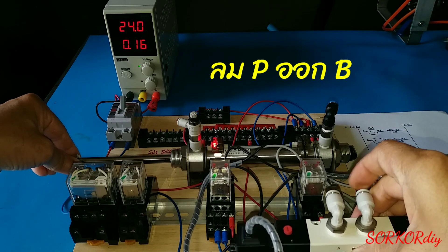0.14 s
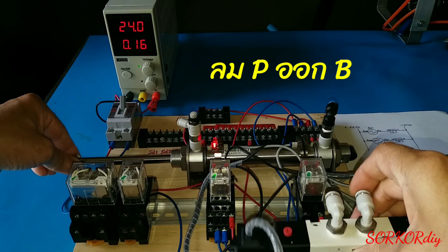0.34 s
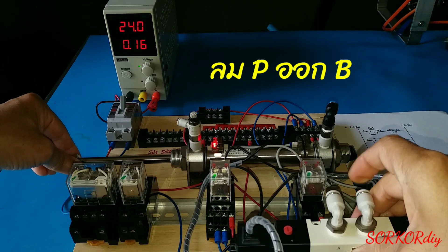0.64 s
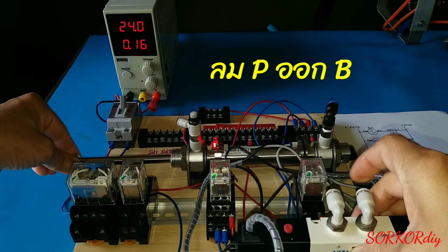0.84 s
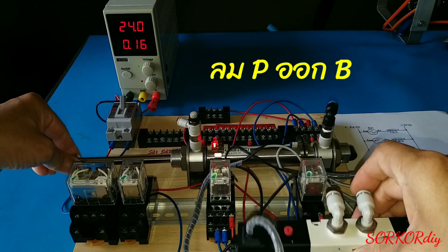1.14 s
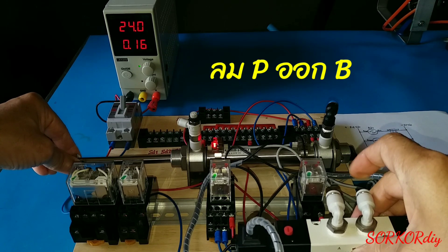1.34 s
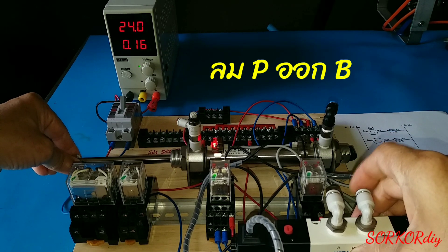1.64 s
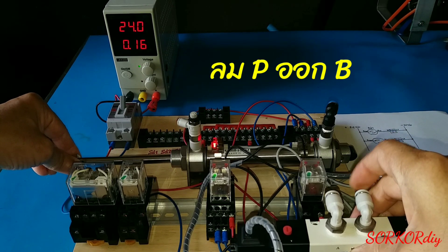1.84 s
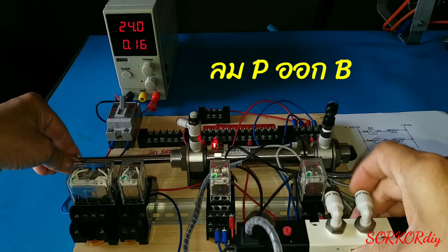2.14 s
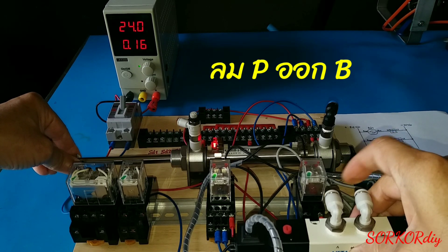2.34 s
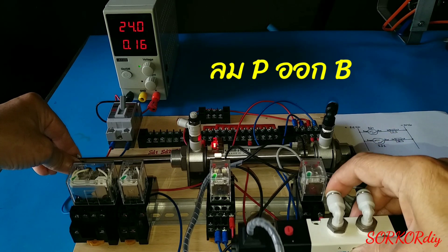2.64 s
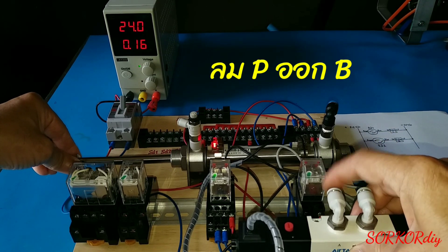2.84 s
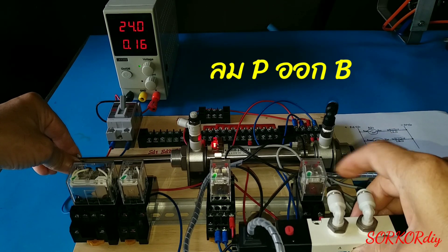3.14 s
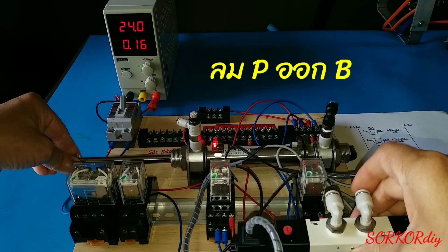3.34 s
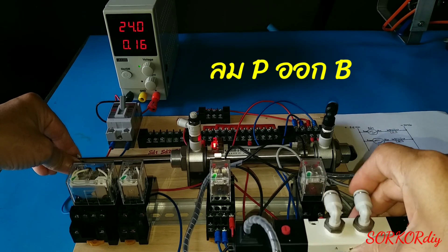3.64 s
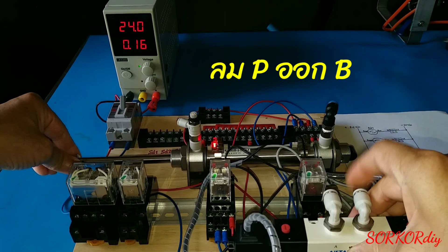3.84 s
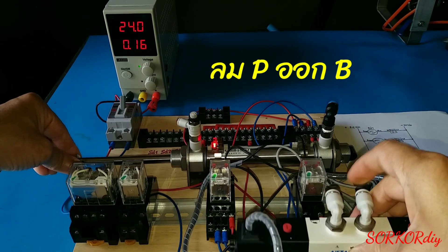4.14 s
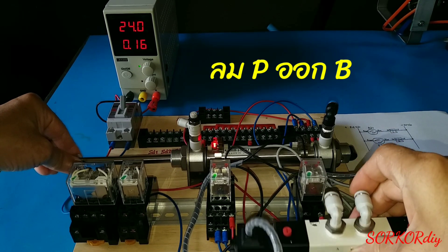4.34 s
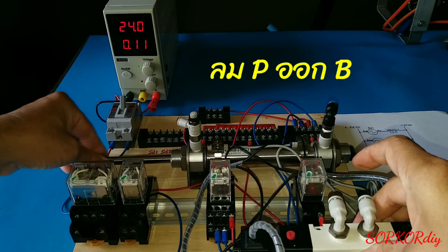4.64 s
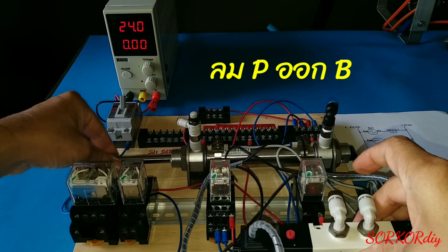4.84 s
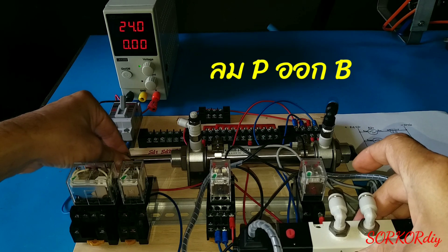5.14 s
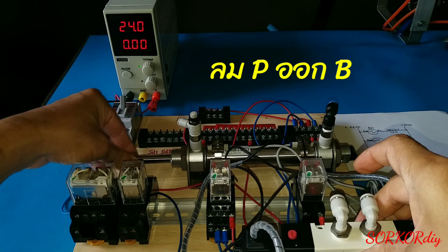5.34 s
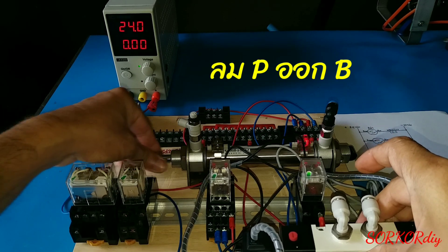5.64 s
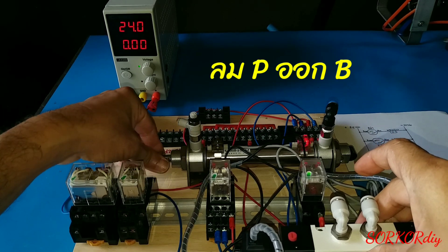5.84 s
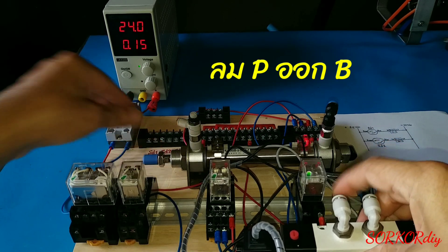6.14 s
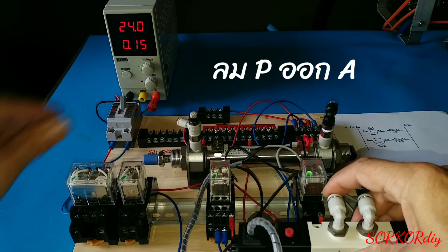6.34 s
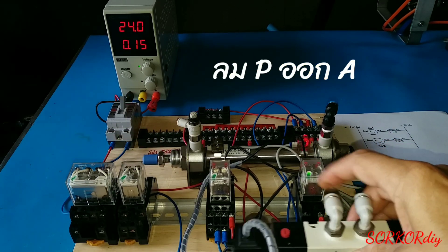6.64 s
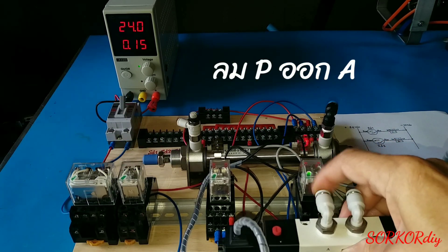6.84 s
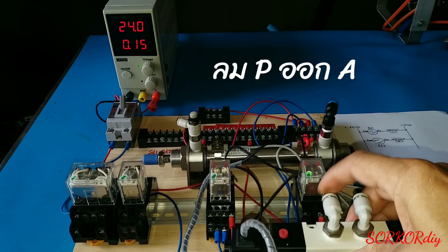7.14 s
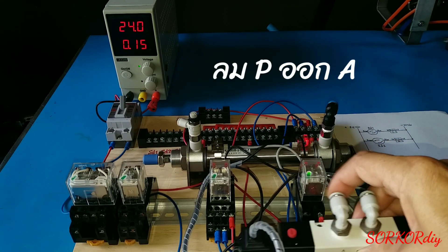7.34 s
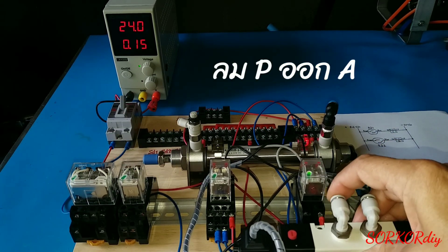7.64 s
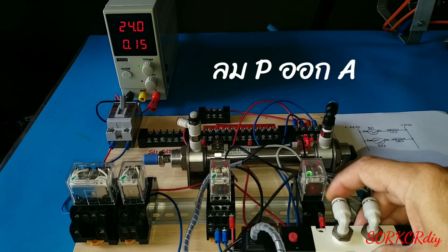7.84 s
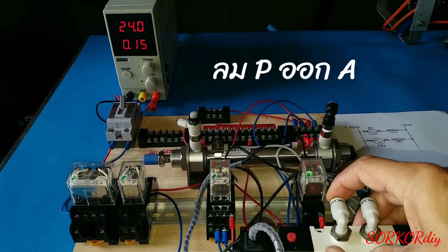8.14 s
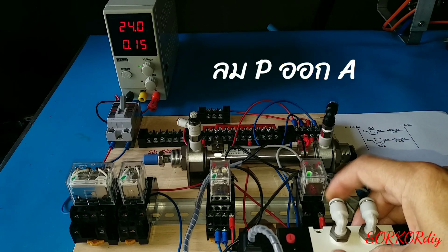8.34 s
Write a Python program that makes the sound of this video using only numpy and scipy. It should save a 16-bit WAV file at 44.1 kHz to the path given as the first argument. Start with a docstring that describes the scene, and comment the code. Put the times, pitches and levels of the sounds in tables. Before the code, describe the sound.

Close, dry and loud: pressurised air blasts over two microphones as ragged, bursting noise with a high sizzling hiss on top. Quick finger passes cut the roar for about a tenth or two of a second, deepest near four seconds, then it springs back. Around six seconds the flow moves to another port; afterwards the dips come more regularly and the blowing grows more fluttery, continuing to the end without shutting off.

```python
"""Air roars over a close pair of microphones, unrelated left and right, and a jet hisses high and bright.
Compressed air leaves an open valve port on a bench; the valve then passes it to a second port.
The roar is noise in short bursts, coloured by stream strength; lone eddies thump on the right.
A finger dips in and out of the jet, lowering roar and hiss, with surges at the edges of each dip.
The hiss is noise filtered per port, partly alike at the two microphones, combed by echoes off bench and hand."""
import sys
import numpy as np
from scipy import signal
from scipy.fft import rfft, irfft
from scipy.io import wavfile
from scipy.ndimage import uniform_filter1d

SR = 44100
rng = np.random.default_rng(int(sys.argv[2]) if len(sys.argv) > 2 else 0)


def digitize_waveform(pressure):
    """Quantize a signal to 16-bit integers and store it at the path in sys.argv[1].

    Rows of a 2-D input are taken as channels; values are limited to [-1, 1].
    """
    field = np.atleast_2d(pressure).T
    bounded = np.clip(field, -1, 1)
    quanta = np.round(bounded * 32767).astype(np.int16)
    wavfile.write(sys.argv[1], SR, quanta)


N = 374850

EDGE_HZ = 15505  # upper band limit
SIZE, HOP = 512, 128  # short-time frame and step, samples
HZ = np.fft.rfftfreq(SIZE, 1 / SR)

# flow passes from first port to second: (start [s], end [s])
VALVE_S = (5.5, 6.1)
# lone eddies at the edge of the stream: (time [s], level [dB], starting pitch [Hz])
PUFFS = [(.336, -15, 700), (0.383, -11, 1200), (0.567, -19, 900), (1.25, -21, 1000), (1.762, -11.5, 1000),
         (2.301, -17, 1000), (3.865, -9, 1150), (4.295, -13, 900), (6.263, -12, 1000), (6.801, -8, 1300),
         (6.84, -19, 2000), (6.848, -14, 1600), (7.106, -15, 1100), (7.132, -8, 1000), (7.396, -12, 1000),
         (7.762, -8, 800), (8.075, -18, 1000), (8.36, -10, 1020)]


def amp(db):
    """Decibels to gain."""
    return 10 ** (np.asarray(db) / 20)


def columns(table, at, warp=np.asarray):
    """Interpolates every column of a table at the given times or frequencies."""
    key, *values = np.transpose(table)
    return np.array([np.interp(warp(at), warp(key), v) for v in values])


def by_hz(table, hz):
    """Reads a spectrum table on a log-frequency axis."""
    return columns(table, hz, np.log1p)


def bump(t, centre_s, width_s):
    """Gaussian pulse of height 1; width_s is the half-width at 1/e."""
    return np.exp(-((t - centre_s) / width_s) ** 2)


def spectra(x):
    """Frame times and short-time spectra."""
    return signal.stft(x, SR, nperseg=SIZE, noverlap=SIZE - HOP)[1:]


def sound(z):
    """Short-time spectra back to samples."""
    return signal.istft(z, SR, nperseg=SIZE, noverlap=SIZE - HOP)[1][:, :N]


def smooth_chance(shape, *sizes):
    """Random field of rms 1, smoothed twice along each of its last axes."""
    x = rng.standard_normal(shape)
    for k, size in enumerate(sizes):
        axis = k - len(sizes)
        x = uniform_filter1d(uniform_filter1d(x, size, axis), size, axis)
    return x / x.std()


def covered(t, start, going_in, end, coming_out):
    """How far the finger is in, 0-1, with rounded edges."""
    ramp = np.minimum((t - start) / going_in, (end - t) / coming_out)
    return np.sin(np.pi / 2 * np.clip(ramp, 0, 1)) ** 2


def flow(t, surge_fades_s=0.058, surge_builds_s=0.0052, surge_before=0.77, lingers_s=0.0054):
    """Left stream, right stream and hiss in dB: open flow, lowered by each dip, with surges at its edges."""
    # open flow between dips: (time [s], left stream [dB], right stream [dB], hiss [dB])
    open_flow = [(0.0, -18.5, -16.5, -14), (1.0, -20.5, -16, -15.5), (1.6, -21, -15.5, -14.5),
                 (2.5, -22, -16.5, -15.5), (3.3, -20.5, -15.5, -15), (4.6, -21.5, -15.5, -16),
                 (5.5, -22, -15.5, -14.5), (6.2, -21.5, -15, -15), (6.5, -25, -16.5, -16),
                 (7.3, -20, -16.5, -15.5), (7.9, -22.5, -16, -17), (8.5, -19, -16.5, -16)]
    # finger dips: (start [s], going in [s], stay [s], coming out [s], earlier onset in left and hiss [s],
    # left drop [dB], right drop [dB], hiss drop [dB], surge [dB])
    dips = [(0.028, 0.08, 0.0017, 0.051, 0, 4, 7, 2.5, 3), (0.313, 0.042, 0, 0.076, 0.038, 10.5, 6, 1, 2.5),
            (0.517, 0.1, 0.013, 0.017, 0.014, 8, 14, 0.5, 1),
            (0.752, 0.028, 0.037, 0.05, 0.0016, 8, 9, -0.5, 3.5),
            (1.173, 0.041, 0.045, 0.044, 0.009, 5, 6.5, 1, 4),
            (1.689, 0.053, 0.086, 0.062, 0.0, 6, 5.5, 2, 1),
            (1.981, 0.087, 0, 0.099, 0.0097, 10.5, 19.5, 0.4, 4.5),
            (2.197, 0.05, 0.023, 0.1, 0.014, 6.5, 14, 0.5, 3),
            (2.625, 0.008, 0.077, 0.12, 0.036, 2, 0.7, 1, -0.5),
            (3.399, 0.041, 0.12, 0.053, 0.012, 8, 20, 1, 0), (3.669, 0.072, 0.08, 0.084, 0, 13, 22, 2, 3),
            (4.05, 0.022, 0.041, 0.068, 0.006, 11, 20, -0.5, 2.5),
            (4.249, 0.14, 0.0, 0.053, 0.035, 11, 20, 0.5, 0),
            (5.721, 0.0065, 0.089, 0.074, 0.12, 1, 2.5, 1, -1.5),
            (6.237, 0.008, 0.0076, 0.1, 0.049, 2.5, 6, 2.5, 5),
            (6.467, 0.12, 0.0029, 0.064, 0.087, 1, 6.5, 2.0, 8.5),
            (6.765, 0.032, 0.068, 0.031, 0.006, 5, 7.5, 2, 4),
            (6.994, 0.044, 0.063, 0.072, 0.03, 7, 7.5, 4, 0.5),
            (7.372, 0.046, 0.061, 0.089, 0.0015, 10, 5.5, 1, 5.5),
            (7.764, 0.0061, 0, 0.072, 0.12, 4.5, 10.5, 1, 3.5),
            (7.982, 0.04, 0.044, 0.074, 0.079, 7.5, 8, 1.5, 1.5),
            (8.223, 0.064, 0.0091, 0.093, 0.0015, 11.5, 11, 1.8, -4),
            (8.434, 0.033, 0.045, 0.109, 0, 9.5, 7.5, 3, 6)]
    # share of the surge: rows left stream, right stream, hiss (share [dB/dB])
    surge_share = [
        [0.85],
        [0.24],
        [0.05],
    ]
    level_db = columns(open_flow, t)
    for start, going_in, stays, coming_out, early, left_db, right_db, hiss_db, surge_db in dips:
        end = start + going_in + stays + coming_out
        narrow = covered(t, start, going_in, end, coming_out)
        # left stream and hiss fall earlier and return later
        wide = covered(t, start - early, going_in + early, end + lingers_s, coming_out + lingers_s)
        after = np.exp(-np.maximum(t - end - lingers_s, 0) / surge_fades_s)
        before = surge_before * np.exp(-np.maximum(start - early - t, 0) / surge_builds_s)
        surge = surge_db * (1 - wide) * np.where(t > start + going_in, after, before)
        drop_db = [left_db * wide, right_db * narrow, hiss_db * wide]
        level_db = level_db + surge * surge_share - drop_db
    return level_db


def stream_strength(t):
    """Left and right stream in dB, relative to the strength at which the roar colour holds."""
    # reference strength: (left [dB], right [dB])
    steady_db = [-22, -16]
    return flow(t)[:2] - np.c_[steady_db]


def eddy_bursts(eddy_db=((3.2,), (5.,)), gust_db=((.8,), (.8,)), wilder_per_db=0.022, calm_db=-15,
                wildest=1.7, sputter_db=((2.5,), (5,)), sputter_at_db=-5, sputter_span_db=1.5):
    """Burst envelope of the eddies: wilder in a strong stream, in fits when half blocked, rms 1."""
    now_db = np.repeat(stream_strength(np.arange(0, N, HOP) / SR), HOP, axis=1)[:, :N]
    wild = np.clip(1 + wilder_per_db * now_db, 0, 2)
    wild = wild / (1 + np.exp((calm_db - now_db) / 2.5))  # a blocked stream leaves a smooth rush
    fits_db = np.array(sputter_db) * bump(now_db, sputter_at_db, sputter_span_db) * smooth_chance((2, N), 180)
    eddies_db = wild * eddy_db * np.minimum(smooth_chance((2, N), 14), wildest)
    gusts_db = gust_db * smooth_chance((2, N), 700)
    bursts = amp(eddies_db + gusts_db + fits_db)
    return bursts / np.sqrt(np.mean(bursts ** 2, axis=1, keepdims=True))


def roar(even_hz=3000, deep_hz=130, lag_turns=0.3518):
    """Bursting noise mixed with an even rush in the top and deep bass, coloured as at steady strength."""
    # roar at steady strength: (frequency [Hz], left [dB per Hz], right [dB per Hz])
    steady_roar = [(25, -84, -80), (40, -76, -83), (61.4, -66, -59.5), (138, -61.5, -52), (280, -62, -51),
                   (580, -56.5, -47.5), (1090, -55.5, -48.5), (1880, -55, -51.5), (2960, -56.5, -55.5),
                   (4230, -59.5, -58), (4720, -65.5, -64), (5300, -69, -65.5), (6000, -69, -68),
                   (6940, -83, -95)]
    bursts = eddy_bursts()
    eddies, rush = rng.standard_normal((2, 2, N))
    hz = np.fft.rfftfreq(N, 1 / SR)
    falling = np.exp(-2j * np.pi * lag_turns * np.log1p(hz))  # each eddy slows as it passes: bass comes last
    top = 1 / (1 + (even_hz / (hz + 1)) ** 2)
    deep = 1 / (1 + (hz / deep_hz) ** 2)
    even = np.clip(top + deep, 0, 1)  # share of power that does not burst
    mixed = np.sqrt(1 - even) * rfft(eddies * bursts) * falling + np.sqrt(even) * rfft(rush)
    return irfft(mixed * amp(by_hz(steady_roar, hz)) * np.sqrt(SR / 2), N)


def wind(lull_db=-4, lull_s=0.013, patchy_db=1.0):
    """Eddies roar at each microphone; stream strength, brief gusts and lulls, and valve shift level and colour."""
    # response to stream strength: (frequency [Hz], left [dB/dB], right [dB/dB])
    wind_swing = [(60, 1.25, .2), (150, 1.5, .45), (300, 1.4, .85), (1000, 1.1, 1.05), (3000, .9, .85),
                  (5000, .6, .55)]
    # brief gusts and lulls in the roar: (time [s], 1/e half-width [s], left [dB], right [dB])
    gusts_and_lulls = [(.16, .015, -2, 0), (.36, 0.023, -1, -13), (.51, 0.011, 4, 1), (.665, 0.016, 6, -4),
                       (.87, .012, 3, 3.5), (.9, .012, -9, 1.5), (1.0, 0.033, -2, -2.5),
                       (1.04, 0.027, 2, 2), (1.25, 0.028, 1, -3), (1.75, .015, 2, -5),
                       (1.81, .03, -3, -8.5), (2.16, 0.013, 0, -2), (2.27, .02, -3, -2),
                       (3.46, 0.028, -8, 4), (3.52, .025, -2, 1.5), (3.6, .02, 2, 0.5), (3.78, .03, -3, 3),
                       (3.83, .02, 1, 1), (3.92, .012, 5, 3), (4.04, 0.012, 5, 0), (4.075, .015, -2, 0),
                       (4.12, .012, 7, 3), (4.265, .015, 8, -0.5), (4.45, .015, 6, 0),
                       (4.63, 0.017, -5, -1), (4.74, 0.014, 2, 4.5), (5.08, .012, -2, 0),
                       (6.19, 0.028, 2, 1), (6.1, 0.011, 0, 0), (6.33, .007, -7, -6), (6.44, .015, 2, -1.5),
                       (6.53, .015, 0, -1), (6.485, 0.017, 7, 2.5), (6.57, .012, -2, 4),
                       (6.66, 0.016, 2, 0), (6.78, .008, 2, -1), (6.86, .015, -1, 3), (6.9, .015, 5, 3.5),
                       (6.93, .012, 3, -7), (6.97, 0.011, 7, -5), (7.04, .015, 5, 1), (7.11, 0.011, -8, 3),
                       (7.18, 0.013, 6, 2), (7.27, 0.014, 6, 2), (7.425, 0.0088, 7, -6),
                       (7.465, 0.018, 5, -9), (7.49, .015, 2, 2), (7.69, 0.013, -3, -9),
                       (7.73, 0.024, 7, -3.5), (7.67, .008, -3, 4), (7.81, .012, -1, -6),
                       (7.86, .015, 7, -2), (7.92, 0.031, -3, -4), (7.985, 0.015, 12, -2),
                       (8.03, 0.027, 0, -6), (8.075, .012, -2, 6), (8.135, 0.022, 2, 4),
                       (8.245, 0.009, 0, 4), (8.29, .018, 2, -13), (8.345, .01, 0, -2),
                       (8.395, 0.012, 10, 1), (8.44, .012, 1, -2)]
    # response to a gust or lull: (frequency [Hz], change [dB/dB])
    gust_reach = [(80, -0.5), (300, 0.64), (1000, 0.84), (2500, 0.54), (5000, 0.85)]
    # extra bass loss in deep dips: (frequency [Hz], left [dB/dB^2], right [dB/dB^2])
    choke = [(60, 0, .045), (150, 0, .042), (300, 0, .025), (1000, 0, .004), (3000, 0, 0)]
    # roar from second port against first: (frequency [Hz], left [dB], right [dB])
    second_roar = [(100, -1, -0.5), (300, 0, -0.5), (1000, 0, -0.1), (2500, -0.9, 0.5), (5500, 0, 1.5)]
    t, z = spectra(roar())
    strength_db = stream_strength(t)
    brief_db = sum(np.c_[[left, right]] * bump(t, s, width) for s, width, left, right in gusts_and_lulls)
    # the right stream slackens around each lone eddy
    brief_db[1] = brief_db[1] + sum(lull_db * bump(t, s, lull_s) for s, _, _ in PUFFS)
    swing_db = strength_db[:, None] * by_hz(wind_swing, HZ)[:, :, None]
    choked_db = np.minimum(strength_db, 0)[:, None] ** 2 * by_hz(choke, HZ)[:, :, None]
    gusty_db = brief_db[:, None] * by_hz(gust_reach, HZ)[:, :, None]
    second_db = np.interp(t, VALVE_S, [0, 1]) * by_hz(second_roar, HZ)[:, :, None]
    patches_db = patchy_db * smooth_chance(z.shape, 6, 12)
    return sound(z * amp(swing_db - choked_db + gusty_db + second_db + patches_db))


def puffs(slows_s=0.00076, lasts_s=0.0017, thin_hz=110):
    """Lone eddies at the right microphone: a thump of fast-falling pitch, with little deep bass."""
    out, t = np.zeros((2, N)), np.arange(600) / SR
    envelope = 2 * np.sqrt(t / lasts_s) * np.exp(-(t / lasts_s) ** 2)
    for s, db, hz in PUFFS:
        turns = hz * slows_s * np.log1p(t / slows_s)
        out[1, round(s * SR):][:len(t)] += amp(db) * np.sin(-2 * np.pi * turns) * envelope
    return signal.sosfilt(signal.butter(2, thin_hz, "high", fs=SR, output="sos"), out)


def port(z, colour, pair, echoes, rumble_hz=200):
    """One port at two microphones: partly alike with a phase lead, combed by echoes, each gain of rms 1."""
    like, lead = by_hz(pair, HZ)[:, :, None]
    like = np.clip(like, 0, 1)
    right = like * np.exp(1j * lead) * z[0] + np.sqrt(1 - like ** 2) * z[1]
    comb = [abs(1 + sum(amp(db) * np.exp(-2j * np.pi * HZ * ms * 1e-3) for ms, db in side))
            for side in echoes]
    gain = amp(by_hz(colour, HZ)) * comb * (HZ < EDGE_HZ) * (HZ > rumble_hz)
    gain /= np.sqrt(np.mean(gain ** 2, axis=1, keepdims=True))
    return np.array([z[0], right]) * gain[:, :, None]


def jet(steady_db=-15.5, hiss_right_db=-1.62, wavers_db=0.5, patchy_db=1.6, ridges_db=2.0):
    """Turbulent hiss with drifting patches, and narrow ridges that drift slowly at random."""
    # relative hiss colour per port: (frequency [Hz], left [dB], right [dB])
    first_port = [(150, -45, -31), (500, -30, -43), (1540, -14, -16), (3400, -23, -15), (4300, -22.5, -20),
                  (4830, -19, -19), (5560, -19.5, -17), (6100, -21, -32), (6600, -18, -26),
                  (7000, -32, -24), (7500, -21, -22), (7690, -8.5, -14.5), (9550, -5.5, -13),
                  (11100, -2.5, -11), (11900, -3.5, -7.5), (12400, -5, -9.5), (12600, -0.5, -4.5),
                  (13200, 2.5, -5.5), (13600, 0.5, -5), (14300, 0, -4.5), (14800, 2, -9),
                  (15400, -5.5, -11.5), (15900, -4, -6)]
    second_port = [(150, -30, -8), (500, -26, -8), (1500, -13, -28), (3500, -39, -14), (4800, -14, -35),
                   (5700, -17, -17), (7130, -15.5, -15.5), (8000, -4, -10.5), (9800, -1, -11.5),
                   (11200, 0, -4), (12000, 2.5, -10), (12800, 2.5, -2), (13600, 0.5, 0.5), (14600, 2.5, -8),
                   (15300, 4.5, -1)]
    # likeness of the two microphones: (frequency [Hz], likeness [0-1], lead of the right [rad])
    first_pair = [(3000, .05, -3.1), (4600, .7, -3.1), (7500, .6, -3.1), (9000, .25, -1.7),
                  (11500, .45, -.7), (13000, .65, .1), (15500, .45, 2.3)]
    second_pair = [(3000, .05, 4.4), (8000, 0.29, 2), (10300, .2, 4.7), (11500, 0.46, 3.8),
                   (13000, 0.41, 4.8), (15500, .1, 4)]
    # echoes off bench and hand, left list then right: (delay [ms], level [dB])
    first_echoes = [
        [(.72, -21), (1.178, -18), (1.868, -21)],
        [(.465, -23), (.714, -21)],
    ]
    second_echoes = [
        [(.724, -23)],
        [(.456, -21)],
    ]
    # response to jet level: (frequency [Hz], change [dB/dB])
    jet_swing = [(5000, 3.5), (9000, 1.04), (11000, 1.24), (14000, 2)]
    # finger grazes the edge of the jet: (time [s], change [dB], 1/e half-width [s])
    flares = [(.17, 0, .02), (.3, 1, 0.037), (.439, 2, 0.018), (.678, 1, .025), (.743, 1.5, .015),
              (.873, 1, .03), (1.078, 1, 0.02), (1.177, 1, .015), (1.312, 0.5, .02), (2.18, 1, .02),
              (2.335, 0.5, .02), (3.377, 3, 0.025), (3.617, 4.5, 0.0089), (3.682, -0.5, 0.013),
              (3.901, 2.5, 0.011), (4.19, 2.5, .015), (4.265, 1.5, 0.011), (4.44, 0.5, .03),
              (6.326, 2, 0.052), (6.645, 0.5, .02), (6.909, 0.5, 0.022), (7.6, 1, .045), (7.88, 1, .04),
              (8.137, 1.5, 0.014), (8.39, 1, 0.011)]
    t, z = spectra(rng.standard_normal((2, N)))
    moved = np.interp(t, VALVE_S, [0, 1])
    first = port(z, first_port, first_pair, first_echoes)
    second = port(z, second_port, second_pair, second_echoes)
    flares_db = sum(db * bump(t, s, width) for s, db, width in flares)
    waver = wavers_db * smooth_chance(len(t), 8)
    hiss_db = flow(t)[2] + flares_db + np.c_[[0, hiss_right_db]] + waver
    level_db = steady_db + (hiss_db - steady_db)[:, None] * by_hz(jet_swing, HZ)[0][:, None]
    patches_db = patchy_db * smooth_chance(z.shape, 5, 20)
    drifting_db = ridges_db * smooth_chance(z.shape, 1, 150)
    return sound(((1 - moved) * first + moved * second) * amp(level_db + patches_db + drifting_db))


def scene():
    """Wind on the microphones, lone eddies and the hiss of the jet."""
    return wind() + puffs() + jet()


def record(dry, headroom=1.5):
    """The input bends the loudest peaks and clips at full scale; then the band limit."""
    clipped = np.clip(headroom * np.tanh(dry / headroom), -1, 1)
    band = signal.firwin(801, EDGE_HZ, window=("kaiser", 9), fs=SR)
    return signal.oaconvolve(clipped, band[None], "same")


dry = scene()
out = record(dry)
digitize_waveform(out)
```